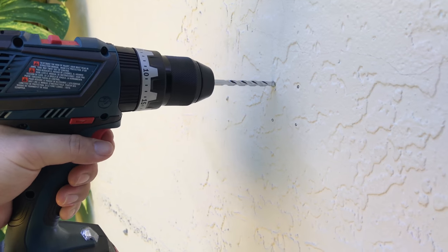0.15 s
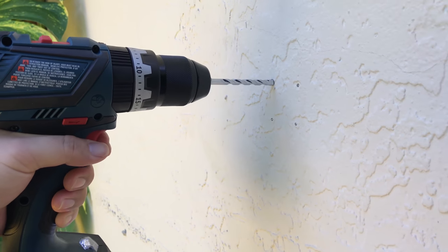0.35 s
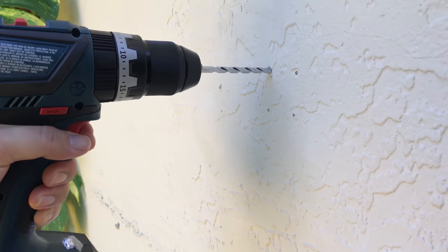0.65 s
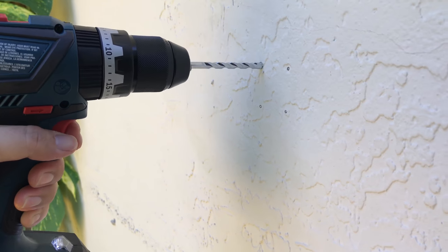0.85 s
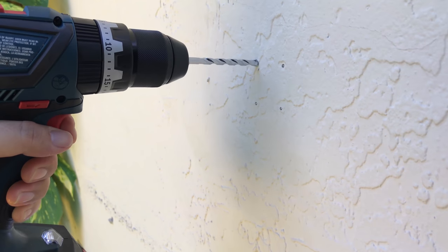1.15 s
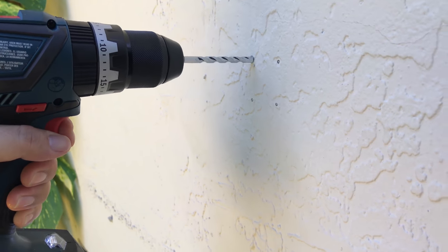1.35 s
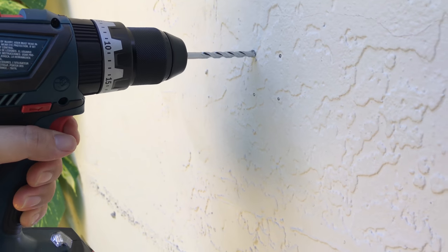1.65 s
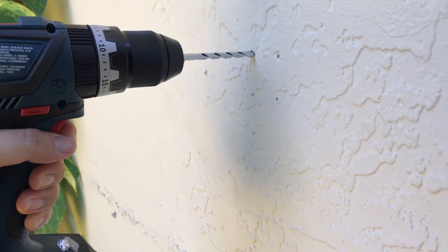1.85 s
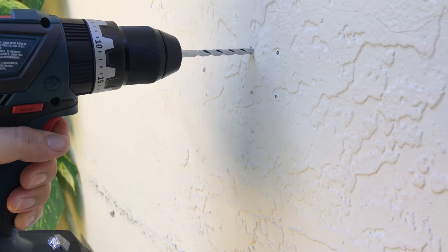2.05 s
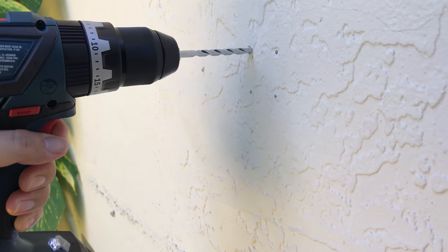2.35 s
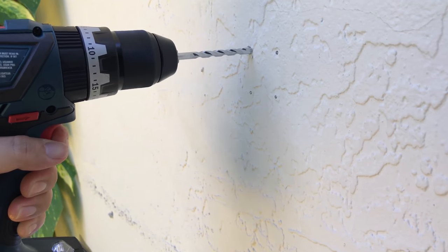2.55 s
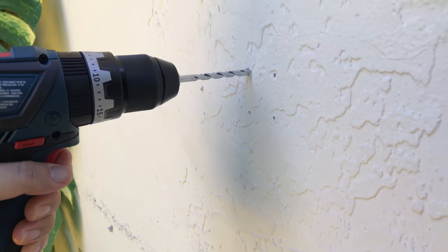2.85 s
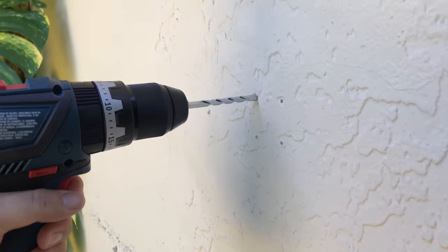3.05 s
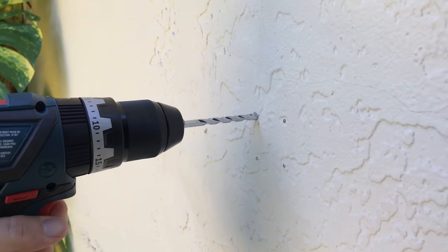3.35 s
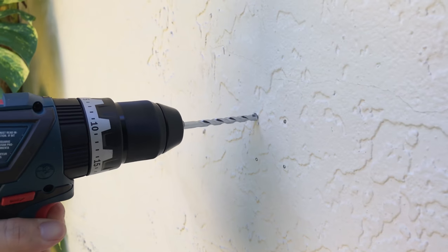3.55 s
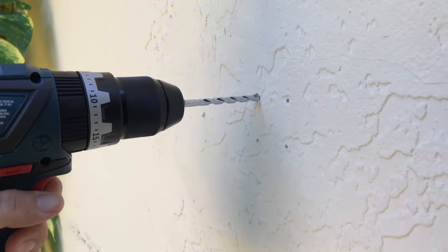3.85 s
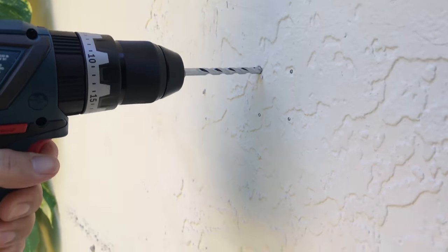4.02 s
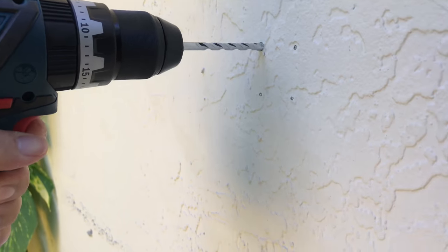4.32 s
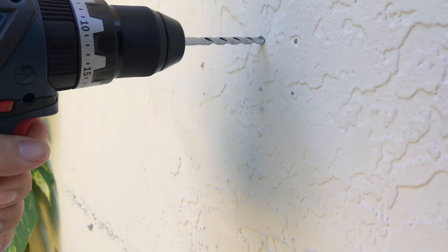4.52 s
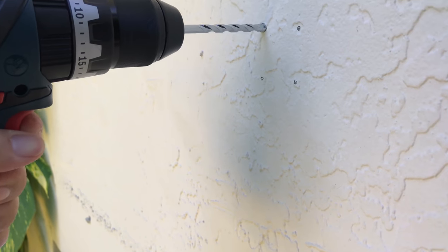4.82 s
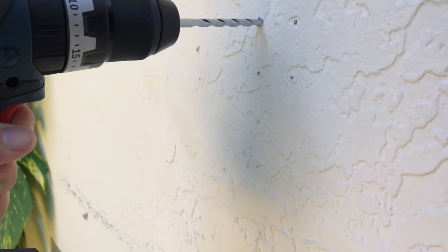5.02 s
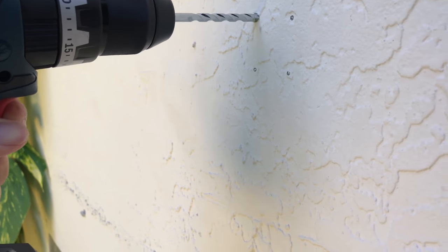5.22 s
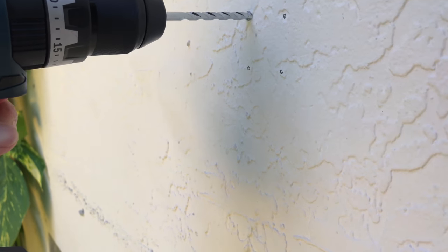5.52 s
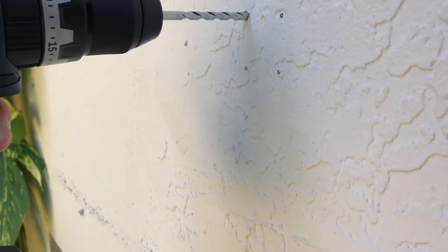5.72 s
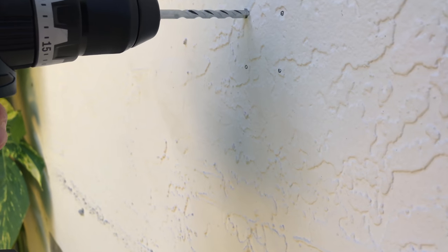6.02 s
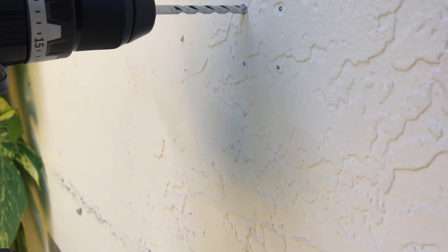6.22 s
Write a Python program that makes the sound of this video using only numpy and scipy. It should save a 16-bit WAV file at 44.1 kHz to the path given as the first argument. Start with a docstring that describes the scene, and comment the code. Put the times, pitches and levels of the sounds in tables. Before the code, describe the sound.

A cordless hammer drill scrapes slowly, then bores into a stone wall with a loud grinding rattle and whine as wind buffets the microphone.

```python
"""A cordless hammer drill bores into a stone wall outdoors, close to the microphone.
First the bit turns slowly, scraping and squeaking, while the ratchet teeth ride over each other.
Then the trigger goes down: the bit skids, the ratchet hammers about a hundred times a second,
and the motor and gears whine. Gusts of air buffet the microphone, over a low outdoor rumble."""
import sys
import numpy as np
from scipy import signal
from scipy.fft import rfft, irfft, next_fast_len
from scipy.io import wavfile
from scipy.ndimage import uniform_filter1d, map_coordinates

SR = 44100
rng = np.random.default_rng(int(sys.argv[2]) if len(sys.argv) > 2 else 0)


def transcribe(u):
    """Save the signal u as a 16-bit wav file named by the first command-line argument.

    u: samples, shape (n,) or (channels, n), limited to [-1, 1]; the rate is SR.
    q: integer samples, one column per channel.
    """
    v = np.clip(np.atleast_2d(u).T, -1, 1)
    q = np.round(v * 32767).astype(np.int16)
    wavfile.write(sys.argv[1], SR, q)


N = 281358
TIME = np.arange(N) / SR

# Motor speed. Each row: time in seconds, turns per second.
SLOW_SPEED = [(0, 42), (0.6, 45), (0.86, 56.5), (1.55, 55.5), (1.8, 50)]  # trigger half pressed
FULL_SPEED = [(2.0, 344), (2.07, 354.3), (2.2, 345.4), (2.92, 345.9), (3.2, 348.7), (3.66, 349.1),
              (4.3, 347.1), (4.37, 350.5), (4.7, 352), (4.92, 355.9), (6.38, 354.6)]  # sags as the bit bites, recovers as the push eases

# The slow start. Each row: time in seconds, scrape level in dB, gear whirr level in dB.
SLOW_LEVELS = [(0.0, -53.5, -48), (0.32, -54, -51.5), (0.52, -50, -52.5), (0.88, -48.5, -49.5),
               (1.35, -52, -62), (1.84, -51.5, -61)]
# Faint singing as the drill starts. Each row: pitch in Hz, level in dB.
SLOW_TONES = [(3000, -65), (3100, -63.5), (3205, -79.5), (5860, -65)]
# How loud the bit is on the stone. Each row: time in seconds, level in dB.
SQUEAKS = [(1.02, -60), (1.085, -57)]
SKID_LEVELS = [(1.872, -56), (1.88, -41), (1.905, -38.5), (1.92, -35), (1.945, -36), (1.99, -60),
               (2.02, -100)]
HAMMER_LEVELS = [(1.92, -31), (2.0, -29.5), (2.08, -31.5), (2.8, -33), (3.9, -32), (4.55, -31),
                 (5.28, -34.5), (5.93, -31), (6.38, -33.5)]
# Motor and gear tones. Each row: pitch as a multiple of the motor speed, level in dB.
GEAR_TONES = [(1, -57), (4, -55), (10, -56), (12.37, -52), (12.66, -52.5), (16, -52)]
# The fast motor. Each row: time in seconds, then whine, a tone just above it and gear hum, all in dB.
WHINE_LEVELS = [(2.0, -43, -64, -51), (2.3, -40.5, -58, -56), (4.28, -43.5, -57, -50.5),
                (4.4, -51.5, -56, -47.5), (5.2, -54.5, -52.5, -49), (5.8, -48, -62, -49.5),
                (6.38, -47.5, -66, -51)]
# Gusts on the microphone. Each row: start in seconds, length in seconds, rumble in dB, flutter in dB.
GUSTS = [(2.05, 0.078, -28.5, -39), (2.178, 0.14, -27.5, -47), (2.5, 0.1424, -32, -44),
         (2.713, 0.13, -26, -44), (3.0, 0.05, -30.5, -56), (3.103, 0.24, -28, -37),
         (3.37, 0.1148, -31, -45), (3.651, .13, -30, -41), (3.825, .03, -29, -38),
         (3.943, 0.13, -24, -39.5), (4.104, .2, -27.5, -33), (4.353, 0.25, -32, -38),
         (4.613, .15, -30.5, -35), (4.798, 0.1455, -28.5, -34), (4.905, 0.442, -26, -31),
         (5.37, 0.13, -30, -46), (5.793, 0.0833, -38.5, -62), (5.973, .08, -25, -41),
         (6.055, .085, -24, -30), (6.179, 0.18, -30, -38.5)]
# The hardest hits of air. Each row: time in seconds, thump in dB, flutter in dB.
BUFFETS = [(2.125, -13, -33.5), (2.544, -19, -34), (2.754, -18.5, -36), (3.115, -25, -29.5),
           (3.139, -18, -40), (3.281, -17, -26), (3.431, -22, -28.5), (3.67, -21, -47), (4.054, -15, -33),
           (4.125, -25, -24.5), (4.155, -17, -24), (4.256, -35, -21), (4.482, -18, -20),
           (4.658, -13, -19.5), (4.714, -16, -17), (4.917, -26, -19.5), (4.988, -21, -20), (5.21, -28, -23),
           (5.254, -27, -22.5), (6.08, -18, -21.5), (6.226, -16, -19)]

# The colour of each noise, from bass to treble. Each row: frequency in Hz, relative strength in dB.
SCRAPE_COLOUR = [(300, -16), (700, -11), (1600, -2), (2700, -6), (4800, -8), (7500, -10.5), (10800, -8),
                 (15500, -11)]
WHIRR_COLOUR = [(300, -24.5), (700, -5), (890, 1.5), (1040, 6), (1300, -3), (2000, -10.5), (4000, -45)]
OUTDOOR_COLOUR = [(20, -41), (40, -12), (65, 2.5), (110, -1.5), (170, -7), (240, -4), (400, -13.5),
                  (1000, -11), (4000, -37), (15000, -42)]
SKID_COLOUR = [(500, -29), (1500, -9), (2300, -8), (2950, 3), (3700, -4), (4800, -6), (6300, -5),
               (8000, -10.5), (15000, -16)]
STONE_COLOUR = [(100, -27.5), (350, -5), (700, -4), (1000, 6), (1450, -1.5), (2300, 2), (3600, 2),
                (5000, -1.5), (7700, -4), (10600, -4), (13500, -1.5), (15800, -0.5)]
DUST_COLOUR = [(100, -14.5), (350, -12), (700, 3), (1000, -4.5), (1450, 3), (2300, -2), (3600, -1),
               (5000, -2.5), (7700, -2.5), (10600, -1), (13500, 0.5), (15800, -9)]
RUMBLE_COLOUR = [(15, -45), (28, -19), (40, -4.5), (55, 2), (85, -2), (130, -6), (220, -11), (400, -22.5),
                 (900, -62), (2000, -80)]
FLUTTER_COLOUR = [(60, -42), (160, -4), (300, 2), (500, -3), (800, -8.5), (1400, -16), (3000, -70),
                  (8000, -70)]

# Modes: the pitches at which a part rings. Each row: pitch in Hz, width in Hz, relative strength in dB.
SCRAPE_MODES = [(1530, 130, 5.5), (2352, 470, 4), (3270, 430, 8), (4380, 303, 4), (6100, 980, 15.5),
                (8620, 455, 5.5), (9600, 350, 3.5), (12070, 550, 6)]  # drill body and bit, slowly scraping
BIT_MODES = [(14230, 350, -0.5), (14900, 600, -7)]  # along the steel bit
BODY_MODES = [(1815, 550, 5), (2300, 422, 4.5), (3040, 210, 3.5), (4205, 470, 7), (5880, 950, 9),
              (6940, 410, 4), (8380, 710, 5.5), (9800, 490, 6), (11240, 380, 3.5), (12485, 870, 5)]  # drill body and bit under the blows
CASE_MODES = [(1533, 340, -2.5), (1760, 280, 0.5), (2220, 414, -3), (3160, 380, -7.5), (4330, 282, -1.5)]  # gear case struck by the ratchet

BLOWS_PER_TURN = .291  # ratchet teeth that pass in one turn of the motor
TRIGGER_S, RUN_UP_S = 1.87, .051  # the trigger goes down; how quickly the motor speeds up
HUM_MULTIPLE, MESH_MULTIPLE, WHINE_MULTIPLE = 8, 12.37, 29  # pitches, as multiples of the motor speed


def amp(db):
    """Turn decibels into a gain to multiply by."""
    return 10 ** (np.asarray(db) / 20)


def unit(x):
    """Scale a signal to an average strength (rms) of 1."""
    return x / np.sqrt(np.mean(x ** 2) + 1e-20)


def curves(rows):
    """Join a table's rows with straight lines: one curve for each column after the time."""
    times, *columns = np.transpose(rows)
    return [np.interp(TIME, times, column) for column in columns]


def after(start, rise):
    """Fade from 0 to 1, beginning at start and taking rise seconds."""
    return np.clip((TIME - start) / rise, 0, 1)


def wobble(rate):
    """A smooth curve through rate random values a second."""
    return map_coordinates(rng.standard_normal(int(N * rate / SR) + 4), [TIME * rate])


def filtered(x, response):
    """Multiply each frequency in x by response(hz)."""
    size = next_fast_len(N + SR // 4)
    return irfft(rfft(x, size) * response(np.fft.rfftfreq(size, 1 / SR)), size)[:N]


def colour(points, hz):
    """Read the gain at each frequency from a colour table."""
    points_hz, db = np.transpose(points)
    return amp(np.interp(np.log(hz + 1), np.log(points_hz), db))


def resonance(hz, centre, width):
    """How one mode answers each frequency: 1 at its centre, less on both sides."""
    return 1j * hz * width / (centre ** 2 - hz ** 2 + 1j * hz * width)


def noise(points):
    """Steady noise of the given colour, at strength 1."""
    return unit(filtered(rng.standard_normal(N), lambda hz: colour(points, hz)))


def contact_noise(force, points, modes):
    """Coloured noise that follows a force and is boosted at the modes, at strength 1."""
    def response(hz):
        boosts = [1 + (amp(db) - 1) * resonance(hz, centre, width) for centre, width, db in modes]
        return colour(points, hz) * np.prod(boosts, axis=0)
    return unit(filtered(force * rng.standard_normal(N), response))


def ringing(x, modes):
    """The ring of a part shaken by x, at strength 1."""
    def response(hz):
        return sum((-1) ** k * amp(db) * resonance(hz, centre, width)
                   for k, (centre, width, db) in enumerate(modes))
    return unit(filtered(x, response))


def swells(times, sizes, width):
    """A loudness curve with a bell-shaped rise and fall at each time."""
    power = np.zeros(N)
    for s, size in zip(times, sizes):
        near = slice(max(int((s - 4 * width) * SR), 0), int((s + 4 * width) * SR))
        power[near] += size ** 2 * np.exp(-((TIME[near] - s) / width) ** 2)
    return np.sqrt(power)


def motor_speed():
    """Turns per second: a crawl, then a quick climb to full speed, which wavers under the load."""
    slow, = curves(SLOW_SPEED)
    full, = curves(FULL_SPEED)
    run_up = 1 - np.exp(-(np.maximum(TIME - TRIGGER_S, 0) / RUN_UP_S) ** 1.5)
    return slow + (full + .3 * wobble(14) - slow) * run_up


def tooth_swells(turns, one_tooth_at_s=1.014, width=0.27):
    """One swell for each passing ratchet tooth; width is a share of the tooth spacing."""
    teeth = (turns - np.interp(one_tooth_at_s, TIME, turns)) * BLOWS_PER_TURN
    return np.exp(-.5 * ((teeth - np.round(teeth)) / width) ** 2)


def slow_scrape(turns):
    """The slow bit's gritty scrape swells with every ratchet tooth, over a soft whirr of gears."""
    scrape_db, whirr_db = curves(SLOW_LEVELS)
    grit = amp(1.25 * wobble(700) + 0.83 * np.sin(2 * np.pi * turns))
    catching = after(0.51, 0.25)  # the teeth begin to catch as the drill is pressed on
    teeth = amp(-46 + 1.6 * wobble(11)) * tooth_swells(turns) * catching
    pressure = np.hypot(amp(scrape_db + 2.5), teeth)
    whirr = amp(whirr_db + 1.5 * wobble(38)) * noise(WHIRR_COLOUR)
    singing = sum(amp(db + 2 * wobble(8.9)) * np.sin(2 * np.pi * hz * TIME + 0.61 * wobble(24))
                  for hz, db in SLOW_TONES)
    scrape = pressure * contact_noise(grit, SCRAPE_COLOUR, SCRAPE_MODES)
    return (scrape + whirr + singing * (1 - after(.4, .9))) * (1 - after(1.92, .06))


def outdoors():
    """A quiet, steady rumble in the background."""
    return amp(-51) * noise(OUTDOOR_COLOUR)


def squeaks():
    """The slowly turning tip sets the bit ringing for a moment."""
    times, db = np.transpose(SQUEAKS)
    return swells(times, amp(db), width=.012) * ringing(rng.standard_normal(N), BIT_MODES)


def skid():
    """The bit rasps on the stone as it gathers speed."""
    skid_db, = curves(SKID_LEVELS)
    roughness = unit(amp(1.8 * wobble(400)))
    return amp(skid_db) * roughness * noise(SKID_COLOUR) * after(1.8, 0.011)


def bursts(kicks, attack_s, decay_s):
    """A loudness curve that jumps up and dies away after each kick, at strength 1."""
    t = TIME[:SR // 20]
    burst = (1 - np.exp(-t / attack_s)) * np.exp(-t / decay_s)
    return unit(signal.fftconvolve(kicks, burst)[:N])


def hammer(turns, jitter_s=.00028, bounce_depth=0.29):
    """Ratchet blows knock the gear case, crush stone and ring the bit; in between, the bit grinds dust."""
    hammer_db, = curves(HAMMER_LEVELS)
    hammer_db = hammer_db + 0.31 * wobble(11)
    # the bit rings louder until dust in the hole damps it
    clean_hole = np.exp(-np.maximum(TIME - TRIGGER_S, 0) / 0.16)
    ring_db = hammer_db - 9 + 4.5 * clean_hole + 1.2 * wobble(9.9)
    teeth = turns * BLOWS_PER_TURN
    times = np.interp(np.arange(1, int(teeth[-1])), teeth, TIME)
    late, size = rng.standard_normal((len(times), 2)).T
    blow_samples = np.clip((times + jitter_s * late) * SR, 0, N - 1).astype(int)
    ticks = np.bincount(blow_samples, minlength=N)
    # the ratchet strikes evenly, but the stone gives way unevenly and the drill bounces every second blow
    bounce = 1 + bounce_depth * after(2.2, 0.66) * (1 + 0.49 * wobble(3.937)) * np.cos(np.pi * teeth)
    kicks = bounce * np.bincount(blow_samples, amp(2.7 * np.tanh(size)), N)
    crush = contact_noise(bursts(kicks, attack_s=0.00038, decay_s=0.0035), STONE_COLOUR, BODY_MODES)
    grind = contact_noise(amp(1.16 * wobble(800) + 0.73 * wobble(60)), DUST_COLOUR, BODY_MODES)
    knock = ringing(ticks * bounce, CASE_MODES)
    blows = (amp(-5.5) * crush + amp(-12) * knock) * after(1.915, .025)
    rattle = blows + amp(-1.66) * grind * after(1.895, 0.0537)
    # the bit rings hard only when its tip lands squarely
    squareness = np.tanh(1.5 * wobble(65))
    landing = bursts(kicks, attack_s=.0008, decay_s=0.0068) * amp(3.6 * squareness)
    ring = ringing(landing * rng.standard_normal(N), BIT_MODES)
    return amp(hammer_db) * rattle + amp(ring_db) * ring * after(1.903, .012)


def motor(turns, speed):
    """Gear tones and the motor's thin whine follow the turning shaft, trembling a little."""
    angle = 2 * np.pi * turns + .006 * wobble(90)
    gears = sum(amp(db + 2.2 * wobble(22)) * np.sin(multiple * angle + 0.35 * wobble(40))
                for multiple, db in GEAR_TONES)
    # speeding up presses the gear teeth together: a short rising chirp
    load = np.maximum(np.gradient(speed), 0)
    gears += amp(-33.7) * load / load.max() * np.sin(MESH_MULTIPLE * angle) * after(1.91, .012)
    whine_db, upper_db, hum_db = curves(WHINE_LEVELS)
    hum = amp(hum_db + 1.5 * wobble(20)) * np.sin(HUM_MULTIPLE * angle + .2 * wobble(40))
    whine = amp(whine_db + wobble(30)) * np.sin(WHINE_MULTIPLE * angle)
    upper_tone = amp(upper_db) * np.sin((WHINE_MULTIPLE + 1) * angle)
    fast_tones = (hum + whine + upper_tone) * after(1.97, .06)
    return np.sqrt(2) * (gears * (speed / speed.max()) ** 2 + fast_tones)


def gusts(attack_s=0.0071, release_s=0.019):
    """Loudness of rumble and flutter: each gust rises fast, holds and dies away, over a light draught."""
    draught = amp(-40.5 + 4.4 * np.tanh(wobble(25.08))) * (1 - after(5.44, .14))
    rumble, flutter = draught, np.zeros(N)
    for start, length, rumble_db, flutter_db in GUSTS:
        shape = after(start, attack_s) * np.exp(-np.clip(TIME - start - length, 0, 1) / release_s)
        rumble = np.maximum(rumble, amp(rumble_db) * shape)
        flutter = np.maximum(flutter, amp(flutter_db) * shape)
    return rumble, flutter


def thumps(times, sizes, width):
    """Each hard swirl of air is one smooth push or pull, with a smaller opposite swing on both sides."""
    pressure = np.zeros(N)
    for s, size, (stretch, sign) in zip(times, sizes, rng.standard_normal((len(times), 2))):
        near = slice(int((s - .04) * SR), int((s + .04) * SR))
        offset = (TIME[near] - s) / (width * np.exp(0.35 * stretch))
        pressure[near] += size * np.sign(sign) * (1 - offset ** 2) * np.exp(-offset ** 2 / 2)
    return pressure


def air(ceiling=0.2):
    """Once the motor runs fast, swirls of air hit the microphone; harder ones also flutter higher up."""
    rumble, flutter = gusts()
    times, thump_db, flutter_db = np.transpose(BUFFETS)
    swirls = np.tanh(1.74 * wobble(70))
    # the rumble keeps a fairly even strength from swirl to swirl
    bass = noise(RUMBLE_COLOUR)
    bass = unit(bass / np.sqrt(np.abs(uniform_filter1d(bass ** 2, size=2205)) + 0.06))
    low = rumble * unit(amp(4.6 * swirls)) * bass + thumps(times + 0.0031, amp(thump_db), width=0.0025)
    sputter = unit(amp(7.6 * swirls + 2.8 * np.tanh(wobble(200))))
    puffs = swells(times + 0.0019, amp(flutter_db), width=0.0039)
    high = np.hypot(flutter * sputter, puffs) * noise(FLUTTER_COLOUR)
    # the strongest gusts are rounded off
    return ceiling * np.tanh((low + high) / ceiling) * after(2.055, 0.01)


def scene():
    """One motor shaft paces the scrape, blows and whine; air and outdoor rumble join them."""
    speed = motor_speed()
    turns = np.cumsum(speed) / SR
    drill = slow_scrape(turns) + squeaks() + skid() + hammer(turns) + motor(turns, speed)
    return (drill + air() + outdoors())[None]


def record(dry):
    """The microphone weakens the deepest bass and cuts off the highest treble."""
    bass_cut_hz, top_hz = 35, 15780
    return filtered(dry[0], lambda hz: (hz < top_hz) * hz ** 3 / np.hypot(hz ** 3, bass_cut_hz ** 3))[None]


dry = scene()
out = record(dry)
transcribe(out)
```